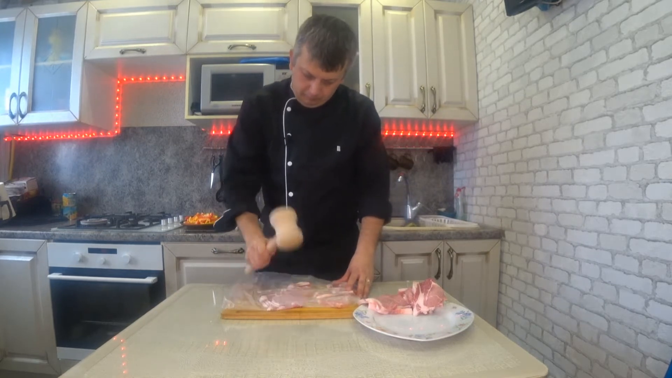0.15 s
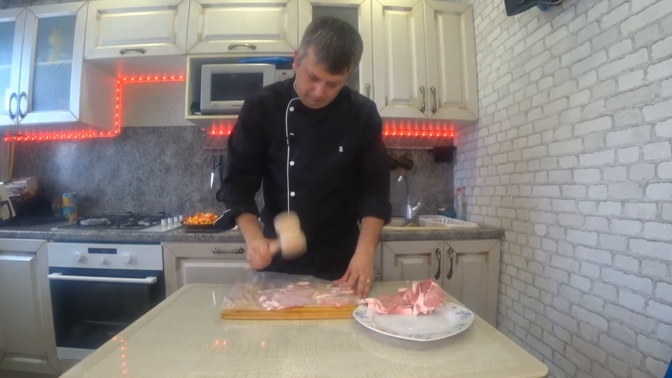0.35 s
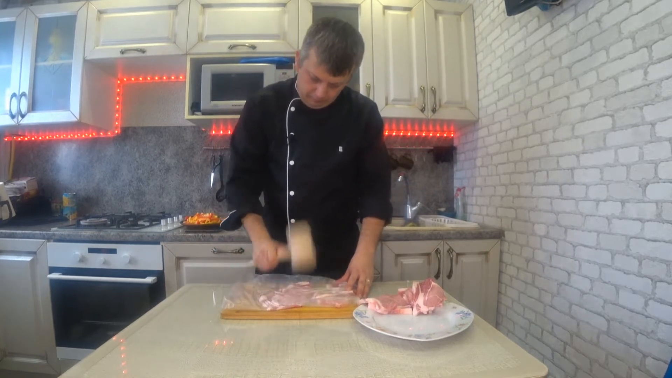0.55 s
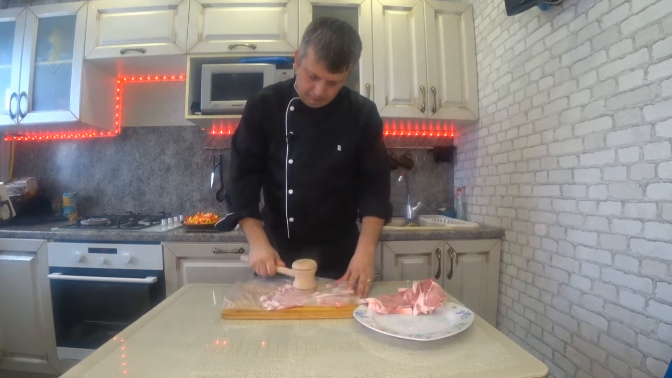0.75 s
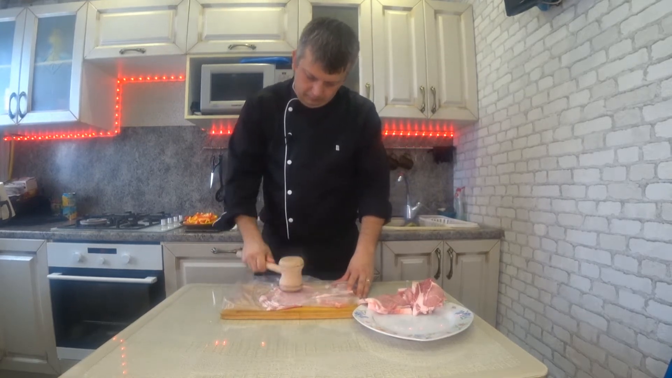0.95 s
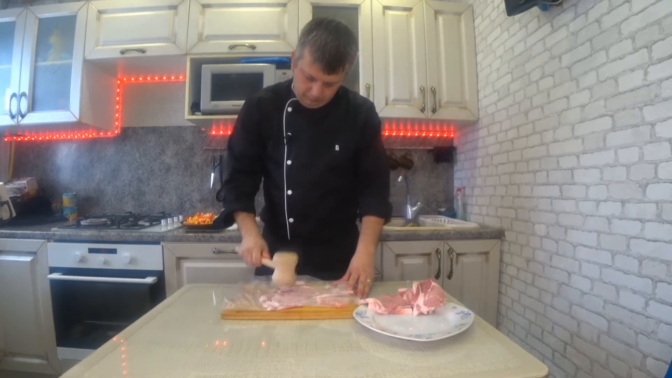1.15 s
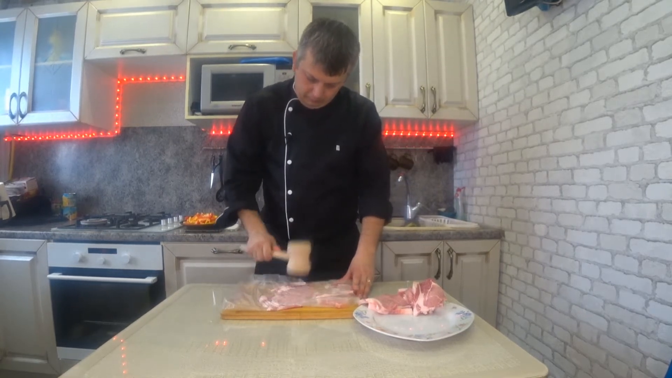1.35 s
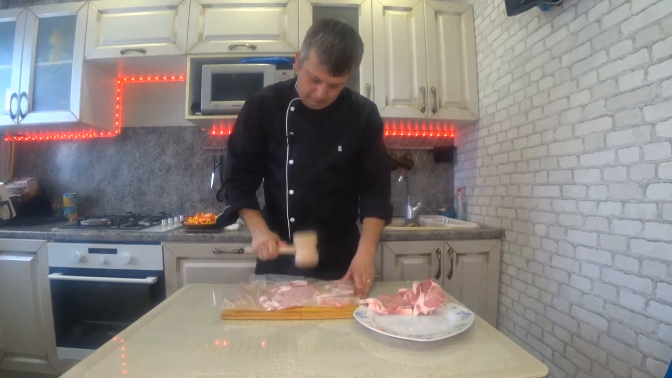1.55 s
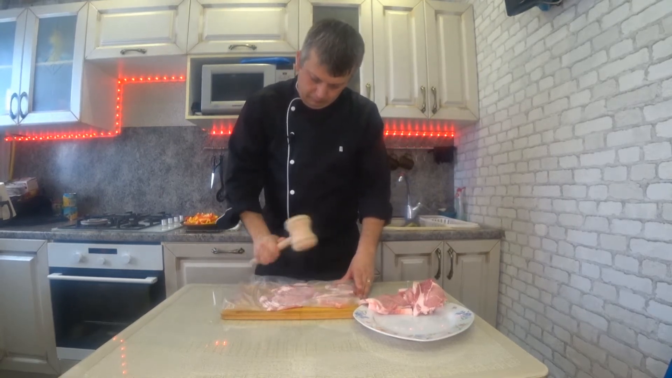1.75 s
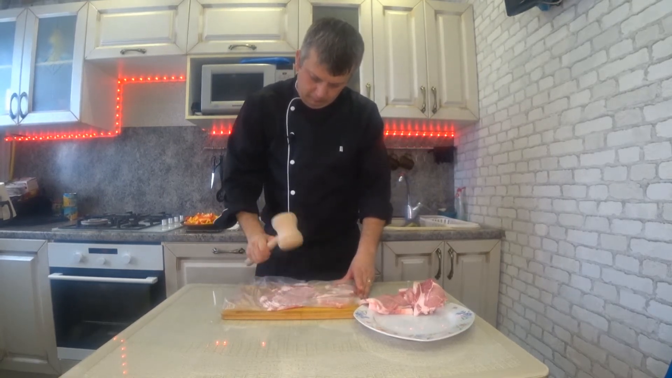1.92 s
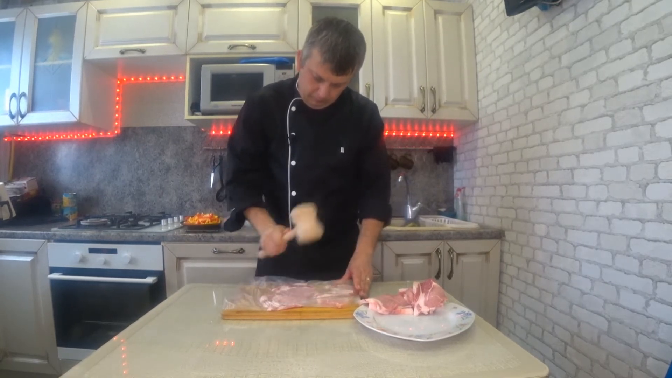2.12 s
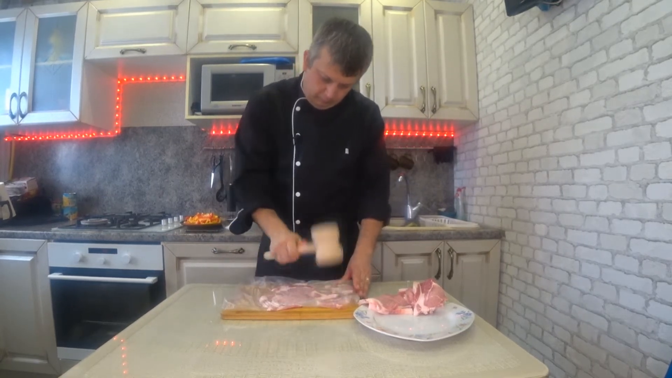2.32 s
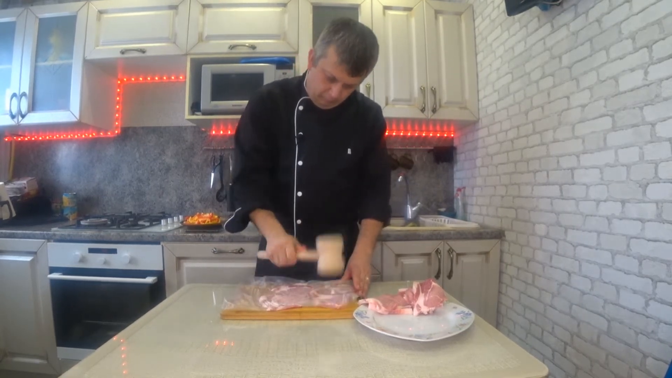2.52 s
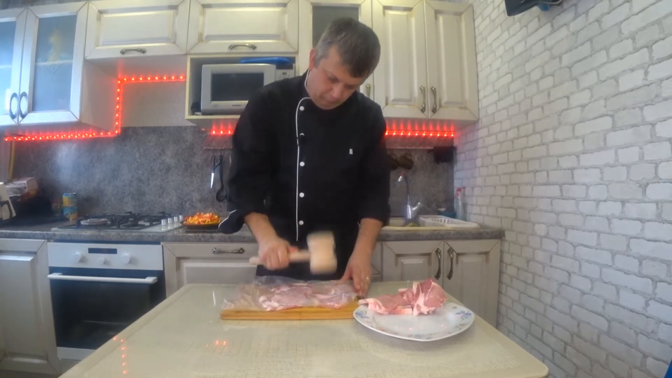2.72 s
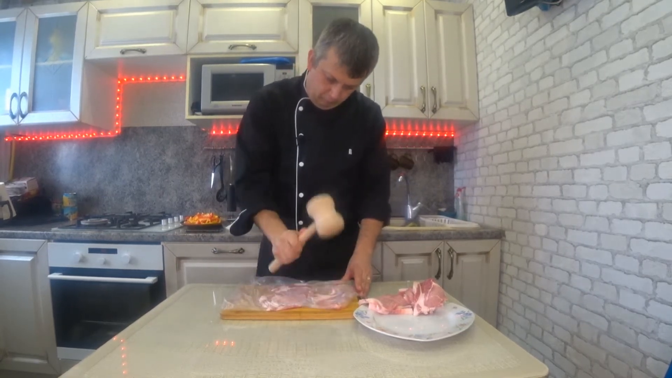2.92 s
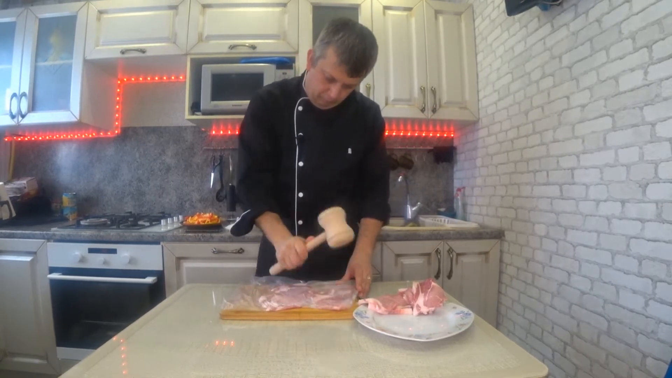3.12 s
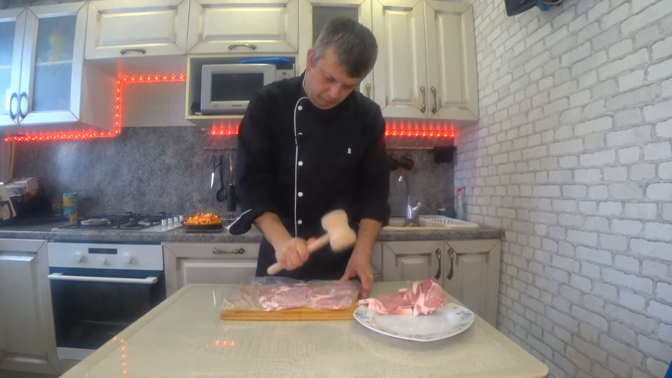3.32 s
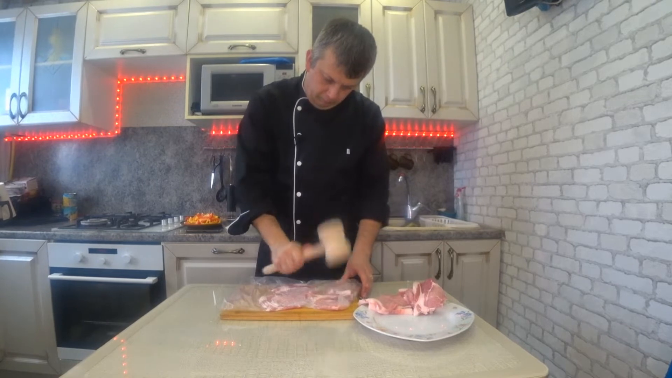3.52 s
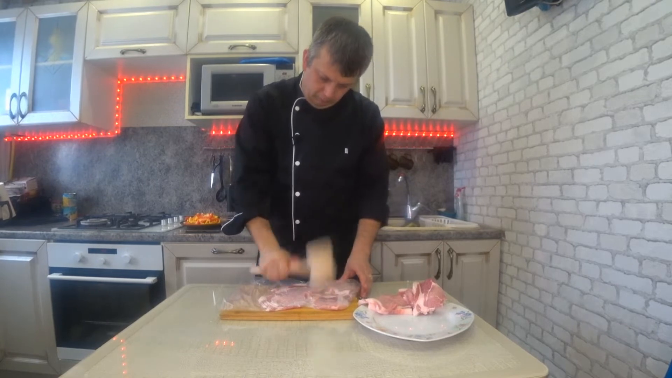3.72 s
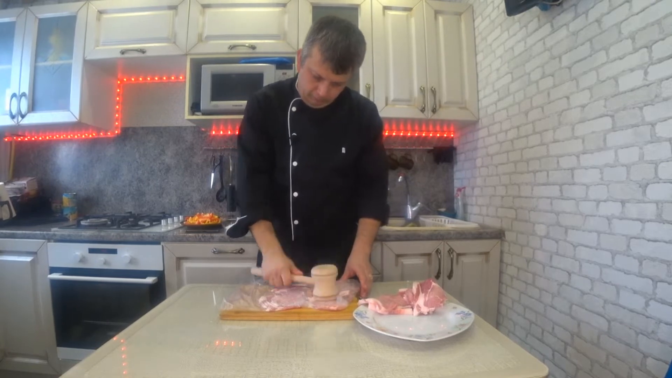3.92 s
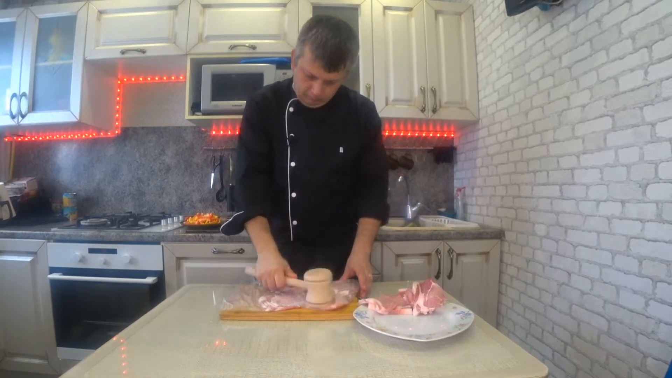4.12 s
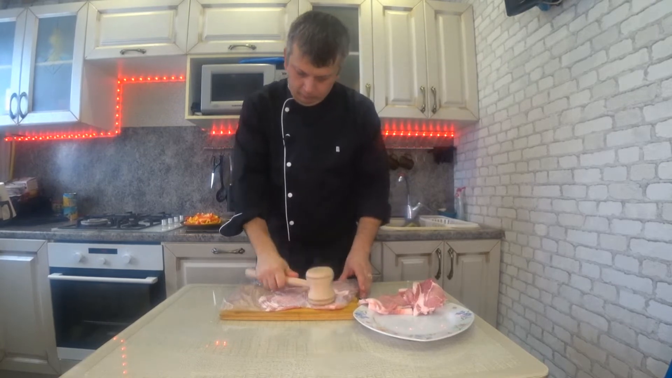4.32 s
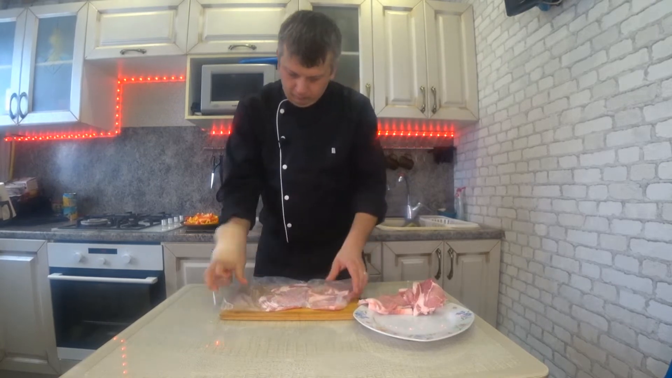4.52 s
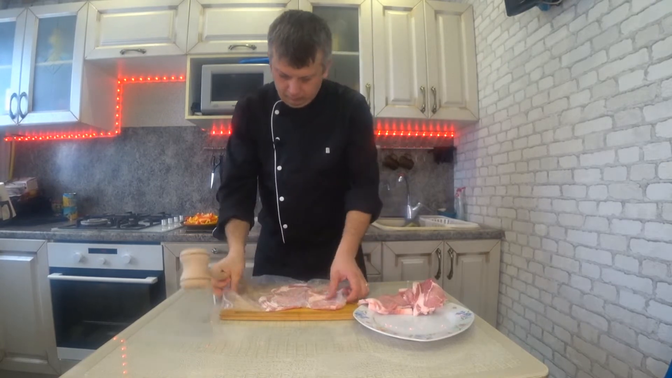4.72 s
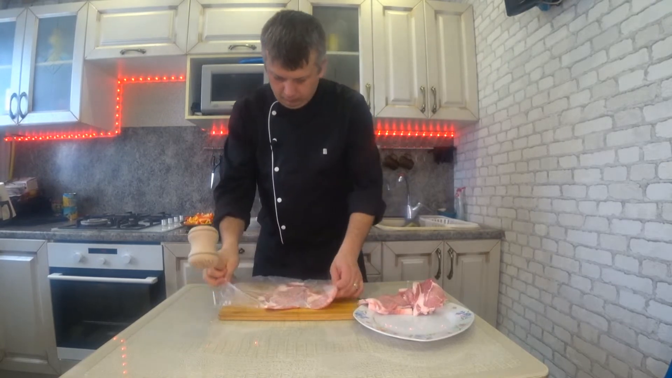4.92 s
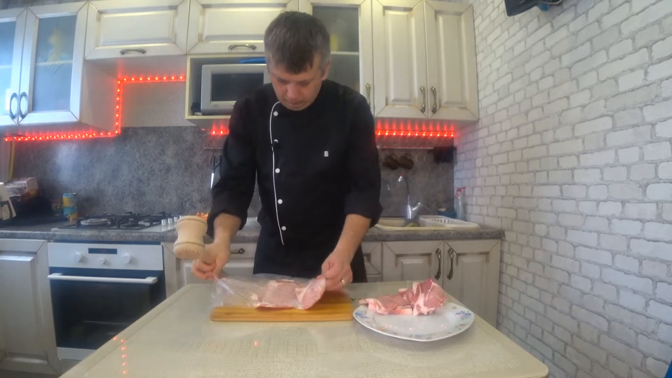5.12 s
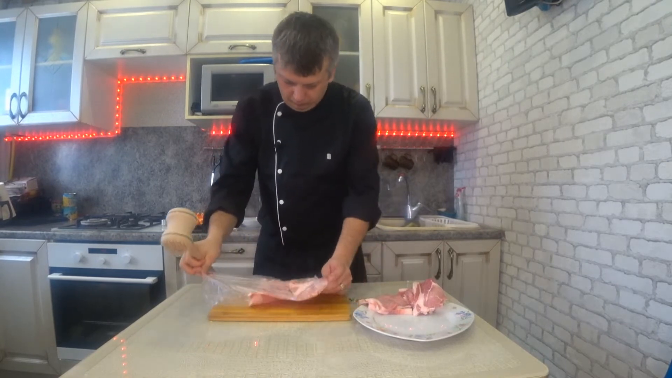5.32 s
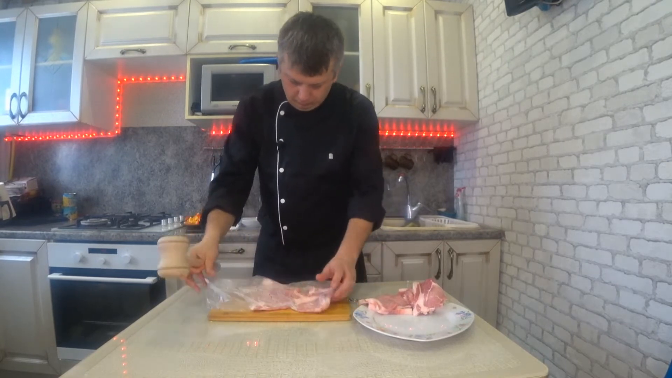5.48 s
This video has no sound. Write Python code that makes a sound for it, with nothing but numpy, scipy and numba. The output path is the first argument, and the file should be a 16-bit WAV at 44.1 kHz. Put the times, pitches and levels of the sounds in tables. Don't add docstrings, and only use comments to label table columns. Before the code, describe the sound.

In a small hard-walled kitchen, a wooden mallet strikes bagged meat about five times a second, each blow a short film slap, a woody thump and a boomy, rattling room tail. After about four seconds the pounding stops, the board rocks back, the mallet is set down with a light knock, and plastic crinkles under the hands. The microphone overloads slightly on the hits.

```python
import sys
import numpy as np
from scipy import signal
from scipy.fft import rfft, irfft, next_fast_len
from scipy.io import wavfile
from scipy.ndimage import uniform_filter1d, map_coordinates
from numba import njit

SR = 44100
rng = np.random.default_rng(int(sys.argv[2]) if len(sys.argv) > 2 else 0)


def how_loud(loudness_db):
    steps = np.asarray(loudness_db, float) / 20
    return 10 ** steps


def waveform_to_disk(signal):
    frames = np.transpose(np.atleast_2d(signal))
    scaled = np.clip(frames, -1, 1) * 32767
    samples = np.round(scaled).astype(np.int16)
    wavfile.write(sys.argv[1], SR, samples)


N = 244755

# start in seconds, slap level in dB, room level in dB, thump frequency in Hz,
# wetness (treble of the room) in dB.
BLOWS = [(0.043, -20.5, -8, 213, -2), (0.207, -32, -6, 214, -2), (0.403, -16, -12, 177, 2),
         (0.5820, -43, -14, 210, 2.5), (0.75, -24, -9.5, 280, 4), (0.9378, -20.5, -17.5, 262, 4),
         (1.1192, -22, -14, 345, 1.5), (1.301, -18, -19, 260, 4.5), (1.4847, -24.5, -15.5, 327, 3.5),
         (1.6575, -24.5, -13.5, 263, 3), (1.8328, -34.5, -15, 274, 3.5), (2.004, -38, -13.5, 286, 1.5),
         (2.244, -18.5, -15.5, 163, 3.5), (2.447, -21, -11.5, 296, -1.5), (2.6571, -20.5, -13, 191, -2.5),
         (2.8358, -19.5, -10, 168, -1), (3.0258, -15, -16, 211, 3), (3.2088, -21, -12, 290, -0.7),
         (3.3824, -19, -18.5, 198, 3.5), (3.5555, -23, -11.5, 222, -1), (3.7362, -37.5, -11, 179, -0.5),
         (3.9319, -24.5, -13, 280, 0), (4.1211, -15, -13.5, 188, -1), (4.2954, -41, -21, 262, -2)]
# start in seconds, room level in dB,
# thump frequency in Hz, wetness in dB.
ROOM_CONTACTS = [
    (-0.05, -23.5, 126.5, -4.5),
    (4.312, -14.5, 200, -5.5),
    (4.7224, -40.5, 406, -4),
]
CUSHIONED = [1, 3, 10, 20, 23]
# frequency in Hz, density in dB per Hz.
CRINKLE = [(880, -6.5), (1500, -5), (1620, -3), (2570, -5), (8040, -3), (10900, -8), (11200, -11),
           (11500, -18), (15000, -58), (22000, -120)]
USUAL_ROOM_DB = -12.5


def unit(x):
    return x / np.sqrt(np.mean(x ** 2) + 1e-20)


def along(points, hz):
    f, v = np.transpose(points)
    return np.interp(np.log(hz + 1), np.log(f + 1), v)


def filtered(x, response):
    m = next_fast_len(x.shape[-1] + 4096)
    spectrum = rfft(x, m) * response(np.fft.rfftfreq(m, 1 / SR))
    return irfft(spectrum, m)[..., :x.shape[-1]]


def noise(spectrum, size):
    return unit(filtered(rng.standard_normal(size), lambda hz: how_loud(along(spectrum, hz))))


def wobble(rate):
    knots = rng.standard_normal(int(N * rate / SR) + 4)
    return map_coordinates(knots, [np.arange(N) * rate / SR])


def bumps(rows):
    t = np.arange(N) / SR
    return sum(how_loud(db) * np.exp(-((t - when) / spread) ** 2) for when, db, spread in rows)


def hush():
    # frequency in Hz, density in dB per Hz.
    hush_spectrum = [(15, -30), (25, -5), (190, 3), (258, 3), (955, -11), (1910, -16), (3270, -14),
                     (7250, -26), (10600, -24), (11500, -63), (15000, -69), (22000, -120)]
    return how_loud(-49.0 + wobble(5.5)) * noise(hush_spectrum, N)


def diffuse_tail(t, spot):
    # frequency in Hz, density in dB per Hz.
    tail_spectrum = [(30, -24), (70, -24.5), (150, -10.5), (300, -9), (500, -8), (720, -16), (1050, -22.5),
                     (1400, -19), (2400, -24), (3900, -29), (9400, -38.5), (11000, -40), (12000, -80)]
    # frequency in Hz, 60 dB decay time in seconds.
    kitchen_decay = [(100, 0.5), (400, 0.36), (1500, 0.35), (4000, 0.36), (10000, 0.28)]
    hz, frames, z = signal.stft(noise(tail_spectrum, len(t)), SR, nperseg=512)
    patches = uniform_filter1d(rng.standard_normal(z.shape), size=4, axis=0)
    rattle_db = 5 * uniform_filter1d(patches, size=4, axis=1)
    decay_db = 60 * frames / along(kitchen_decay, hz)[:, None]
    tail = z * how_loud(rattle_db + along(spot, hz)[:, None] - decay_db)
    return signal.istft(tail, SR, nperseg=512)[1][:len(t)]


def low_modes(t, spot):
    # frequency in Hz, level in dB, 60 dB decay time in seconds.
    table_modes = [(104.7, -8, 0.25), (140.7, 0.5, 0.2), (183.4, -3, 0.36), (243.4, -7.5, 0.64),
                   (271.8, -1.5, 0.49), (308.7, 2, 0.35), (385.3, 2.5, 0.15), (417.5, -6, 0.32),
                   (471, -6, 0.35), (519, -15, 0.14), (558, -3.5, 0.21)]
    f, db, t60 = np.transpose(table_modes)[:, :, None]
    sag = t + 0.027 * 0.036 * (1 - np.exp(-t / 0.037))
    level_chance, pitch_chance, phase = rng.standard_normal((3,) + f.shape)
    level = how_loud(db + along(spot, f) + 2 * level_chance - 60 * t / t60)
    ring = level * np.sin(2 * np.pi * (f * (1 + 0.0078 * pitch_chance) * sag + phase))
    return ring.sum(axis=0)


def room_answer(t, treble_db, bass_db, mid_db):
    spot = [(150, bass_db), (280, 0), (520, mid_db), (1500, treble_db)]
    build_up = 1 - np.exp(-(t / 0.0046) ** 2)
    return (diffuse_tail(t, spot) + how_loud(-3) * low_modes(t, spot)) * build_up


def contact_room(t, number, room_db, hz, wet_db):
    bass_db = min(1.94 + 0.6 * (USUAL_ROOM_DB - room_db), 7.5)
    if number == len(BLOWS) + 1:
        bass_db -= 11
    mid_db = 7.5 * np.log2(hz / 246)
    swell = 1 - np.exp(-t / 0.031) if number in CUSHIONED else 1
    return how_loud(room_db) * swell * room_answer(t, wet_db, bass_db, mid_db)


def slap(ms, slap_db, cushioned):
    # frequency in Hz, density in dB per Hz.
    slap_spectrum = [(300, -31), (1200, 10), (3000, 5), (7000, 1), (11000, -3.5)]
    soft_db = np.clip(-23.5 - slap_db, 0, 9)
    lag, spread = 0.22 + 0.2 * soft_db, 0.98 + 0.04 * soft_db
    burst = np.exp(np.where(ms < lag, 2.6, -0.8) * (ms - lag) / spread)
    burst = burst + how_loud(-28.5) * np.exp(np.minimum(ms, 0) / 3) * (ms < 0)
    burst = burst + how_loud(-17.0) * np.exp(-np.abs(ms) / 14) * (ms > lag)
    if cushioned:
        second_ms = 10.2
        burst = burst + how_loud(-1) * np.exp(-((ms - lag - second_ms) / spread) ** 2)
    return how_loud(slap_db + 11.5) * burst * noise(slap_spectrum, len(ms))


def thump(t, room_db, hz, lost_db):
    # multiple of the thump frequency, level in dB, cycles to -60 dB.
    board_partials = [(1, 2, 4), (.6, -12.5, 1.5), (1.5, -7, 9)]
    thump_db = 0.5 + 0.68 * (room_db - USUAL_ROOM_DB) + lost_db
    ring = sum(how_loud(thump_db + db - 60 * t * k * hz / cycles) * np.sin(2 * np.pi * k * hz * t)
               for k, db, cycles in board_partials)
    return ring * (1 - 0.66 * np.exp(-(2.3 * hz * t) ** 2))


def knock(t):
    # frequency in Hz, level in dB, 60 dB decay time in seconds.
    mallet_modes = [(395, -11, 0.023), (175, -23.5, 0.058), (697, -11, 0.0078), (1340, -25, 0.009),
                    (2010, -28, .008)]
    ring = sum(how_loud(db - 60 * t / t60) * np.sin(2 * np.pi * hz * t) for hz, db, t60 in mallet_modes)
    return ring * (1 - 0.62 * np.exp(-(t / 0.00059) ** 2))


def mallet():
    cushion_db = [-11.5, -13.5, -4, -10.5, -5]
    lost_db = dict(zip(CUSHIONED, cushion_db))
    pad = SR // 2
    out, t = np.zeros(N + 3 * pad), np.arange(pad) / SR
    ms = (t[:pad // 5] - 0.05) * 1000
    for number, (s, slap_db, room_db, hz, _) in enumerate(BLOWS):
        start = pad + round(s * SR)
        out[start - pad // 10:][:len(ms)] += slap(ms, slap_db, number in CUSHIONED)
        out[start:][:pad] -= thump(t, room_db, hz, lost_db.get(number, 0))
    contacts = [(s, *rest) for s, _, *rest in BLOWS] + ROOM_CONTACTS
    for number, (s, room_db, hz, wet_db) in enumerate(contacts):
        out[pad + round(s * SR):][:pad] += contact_room(t, number, room_db, hz, wet_db)
    laid_down = ROOM_CONTACTS[-1][0]
    out[pad + round(laid_down * SR):][:pad] -= knock(t)
    return out[pad:pad + N]


def film(effort_db):
    # peak time in seconds, level in dB, spread in seconds.
    tugs = [(.036, -39.5, 0.0069), (.574, -46, .006), (2.208, -40.5, 0.01), (2.232, -39, 0.0088),
            (1.285, -49, 0.0081), (2.646, -45, 0.0062), (3.022, -30, 0.0016), (3.372, -39, 0.0037),
            (4.682, -43, 0.0091), (5.06, -46, 0.02), (5.415, -37, .01), (5.555, -39.5, 0.018)]
    creases = rng.standard_normal(N) * how_loud(2.4 * wobble(1200) + 0.8 * wobble(50))
    pull = how_loud(effort_db + 1.76) + bumps(tugs)
    return pull * unit(filtered(creases, lambda hz: how_loud(along(CRINKLE, hz))))


def folds():
    # start in seconds, frequency in Hz, level in dB.
    squeaks = [
        (3.0232, 5400, -15),
        (.0402, 4300, -18),
        (4.8455, 3000, -33),
    ]
    # start in seconds, peak level in dB.
    snaps = [(4.5454, -25), (4.5765, -24), (4.604, -32), (4.66, -30), (4.6733, -19), (4.8131, -29),
             (4.8445, -24), (5.1219, -32), (5.2746, -21), (5.299, -21), (5.5335, -33)]
    out, tick = np.zeros(N), np.arange(200) / SR
    for when, db in snaps:
        click = how_loud(db - 11 - 60 * tick / 0.0067) * noise(CRINKLE, len(tick))
        out[round(when * SR):][:len(tick)] += click
    for when, hz, db in squeaks:
        whistle = how_loud(db) * np.hanning(len(tick)) ** 3 * np.sin(2 * np.pi * hz * tick)
        out[round(when * SR):][:len(tick)] += whistle
    return out


def rub(effort_db, strain):
    # frequency in Hz, density in dB per Hz.
    rub_spectrum = [(250, -7), (600, 0.5), (1200, 3.5), (2200, -1.5), (4000, -24)]
    level = how_loud(-52 + 0.62 * (effort_db + 40.5)) + how_loud(-7) * strain
    return level * how_loud(1.5 * wobble(30)) * noise(rub_spectrum, N)


def shoved_board(shake, strain):
    # frequency in Hz, density in dB per Hz.
    creak_spectrum = [(90, -21), (160, -16), (400, 13), (900, -25)]
    rumble_spectrum = [(30, -20), (75, -1), (140, 8), (250, -29), (600, -84)]  # (Hz, dB per Hz)
    creak = strain * how_loud(4.1 * wobble(40)) * noise(creak_spectrum, N)
    rumble = shake * how_loud(3.4 * wobble(25)) * noise(rumble_spectrum, N)
    return creak + rumble


def bag():
    # time in seconds, effort in dB.
    hands = [
        (4.5, -59.5),
        (4.664, -44),
        (4.698, -36),
        (4.788, -49),
        (4.848, -39.5),
        (5.108, -38),
        (5.362, -34.5),
        (5.412, -31.5),
        (5.514, -48),
    ]
    # peak time in seconds, rumble level in dB, creak level in dB, spread in
    # seconds.
    shoves = [
        (4.52, -55, -56, 0.14),
        (4.75, -60, -41.5, 0.029),
        (5.2, -63, -51.5, 0.093),
        (5.32, -42, -48, .02),
        (5.414, -42, -38.5, 0.039),
    ]
    t = np.arange(N) / SR
    effort_db = np.interp(t, *np.transpose(hands)) - 300 * np.clip(hands[0][0] - t, 0, 1)
    shake = bumps([(s, db, spread) for s, db, _, spread in shoves])
    strain = bumps([(s, db, spread) for s, _, db, spread in shoves])
    return film(effort_db) + folds() + rub(effort_db, strain) + shoved_board(shake, strain)


def scene():
    return np.tile(mallet() + bag() + hush(), (2, 1))


def mains_hum():
    # frequency in Hz, rms level in dB.
    hum_tones = [(48.4, -53), (100, -88), (155, -57.5)]
    t = np.arange(N) / SR
    return sum(how_loud(db + 4.5 * wobble(4.1)) * np.sin(2 * np.pi * hz * t + 0.6 * wobble(3.1))
               for hz, db in hum_tones)


def floor_shake(gain):
    # peak time in seconds, level in dB, spread in seconds.
    steps = [
        (0.0, -45, .04),
        (0.74, -37, 0.037),
        (1.05, -41, .04),
        (2.14, -39, .06),
        (2.3, -44, 0.044),
        (2.44, -41, .05),
        (3.92, -48, 0.027),
        (5.31, -39, .015),
        (5.36, -37, .03),
        (5.47, -34, 0.034),
    ]
    shake_spectrum = [(12, -14), (28, 7.5), (52, 7), (75, 3), (130, -58), (300, -120)]  # (Hz, dB per Hz)
    jolts = bumps([(s, -55 + 0.55 * (room_db - USUAL_ROOM_DB), 0.089) for s, _, room_db, *_ in BLOWS])
    sway = how_loud(4 * wobble(9))
    ride = uniform_filter1d(gain, size=2000) ** 0.34
    level = (how_loud(-61) + jolts) * sway * ride + how_loud(-5) * bumps(steps)
    return level * noise(shake_spectrum, N)


def scrambled(x, size, gain):
    hz, t, z = signal.stft(x, SR, nperseg=size)
    z = z * gain(hz, t) * np.exp(2j * np.pi * rng.random(z.shape))
    return signal.istft(z, SR, nperseg=size)[1][:N]


def difference(mid):
    # frequency in Hz, difference minus sum within a cell in dB.
    cell_width = [(60, -20), (300, -24), (1000, -18), (4000, -13), (10000, -12)]

    def cells(hz, t):
        band = (14 * np.log(1 + hz / 1500)).astype(int)
        chance = np.linspace(0.15, 0.03, band[-1] + 1)[:, None]
        is_open = rng.random((band[-1] + 1, len(t))) < chance
        return is_open[band] * how_loud(along(cell_width, hz))[:, None]

    def treble(hz, t):
        return how_loud(along([(200, -50), (3000, 2.5)], hz))[:, None]

    s = np.transpose(BLOWS)[0, :, None]
    apart_db = -28.5 + 11.5 * rng.standard_normal(s.shape)
    reach = np.where(apart_db > -22.5, 0.03, 0.006)
    distance = np.abs(np.arange(0, N, 20) / SR - s - 0.002)
    near = how_loud(apart_db + 4) * np.clip(1 - distance / reach, 0, 1)
    near = np.repeat(near.sum(axis=0), 20)[:N]
    return scrambled(mid, 2048, cells) + near * scrambled(mid, 256, treble)


@njit
def follow(level, attack, release):
    out, e = np.empty_like(level), level[:500].mean()
    for i in range(len(level)):
        e += (attack if level[i] > e else release) * (level[i] - e)
        out[i] = e
    return out


def band_limit(x):
    return signal.sosfilt(signal.butter(12, 16960, fs=SR, output="sos"), x)


def record(dry):
    top_hz = 11050
    heard = filtered(dry[0], lambda hz: hz < top_hz)
    envelope = follow(np.abs(heard), 1 / (0.0019 * SR), 1 / (0.0094 * SR))
    late = np.pad(envelope, (round(0.0031 * SR), 0), "edge")[:N]
    gain = 1 / (1 + (late / how_loud(-22.5)) ** 3) ** (1.014 / 3)
    clipped = gain * heard / (1 + np.abs(gain * heard / 0.16) ** 7) ** (1 / 7)

    def response(hz):
        above = how_loud(-13.5) / (1 + (hz / 16000) ** 40)
        band = np.where(hz < top_hz, 1, above)
        bass_shelf = 0.35 + 0.59 / (1 + (70 / (hz + 1)) ** 4)
        return band * bass_shelf * 1j * hz / (30 + 1j * hz)

    mid = filtered(clipped, response) + gain * mains_hum() + floor_shake(gain)
    side = difference(mid)
    return band_limit(np.array([mid + side, mid - side]))


dry = scene()
out = record(dry)
waveform_to_disk(out)
```